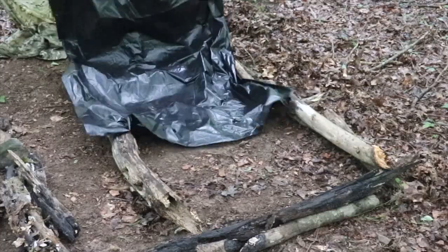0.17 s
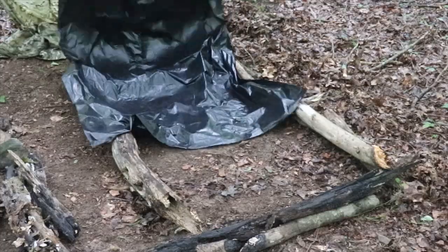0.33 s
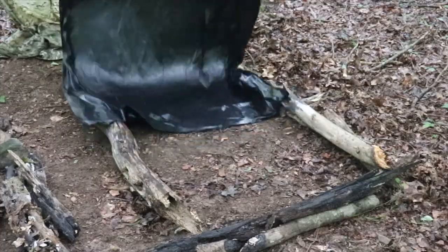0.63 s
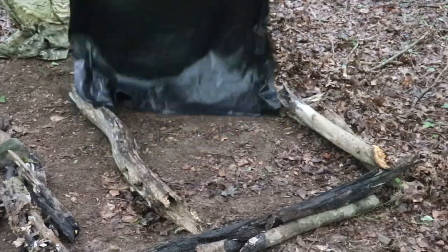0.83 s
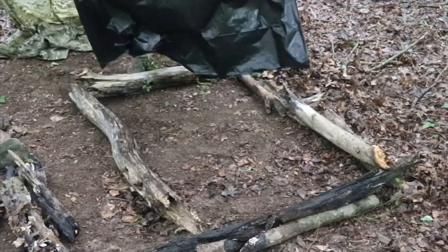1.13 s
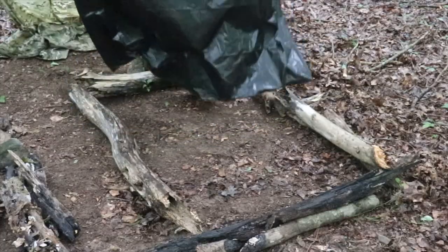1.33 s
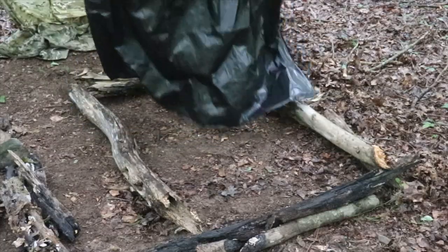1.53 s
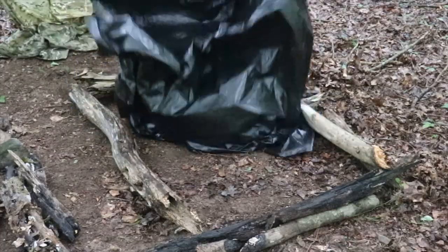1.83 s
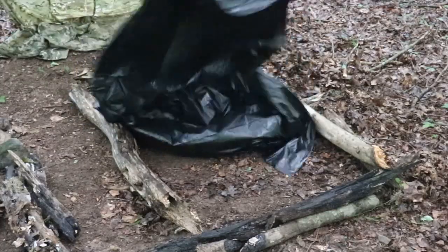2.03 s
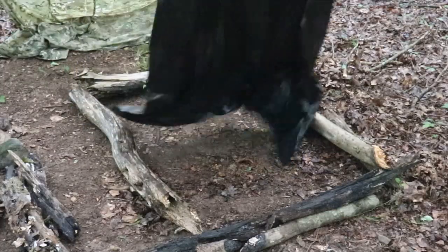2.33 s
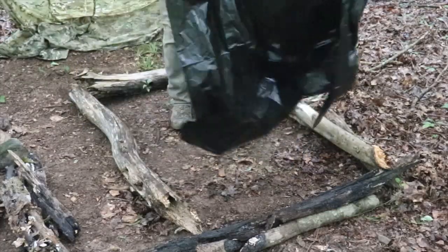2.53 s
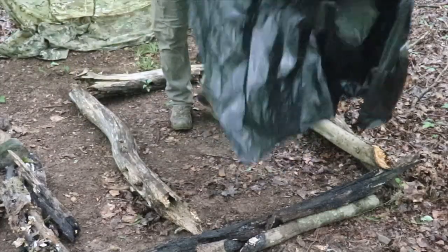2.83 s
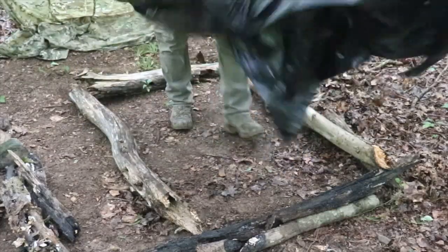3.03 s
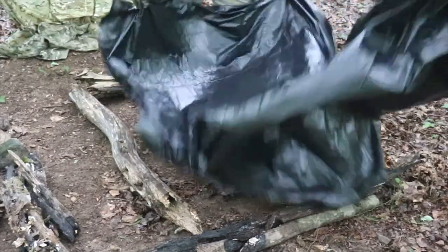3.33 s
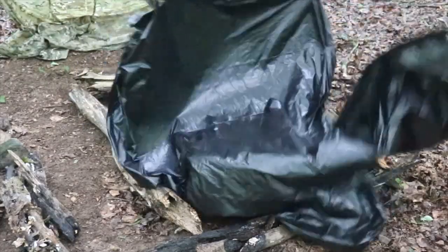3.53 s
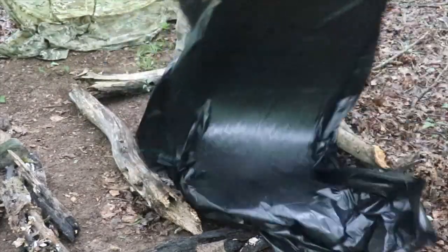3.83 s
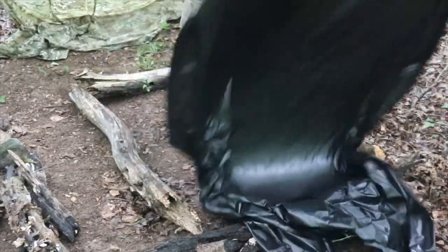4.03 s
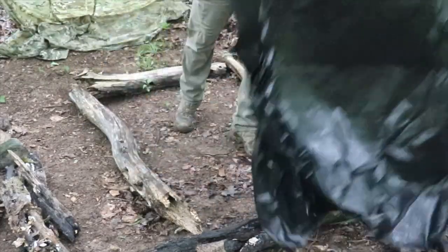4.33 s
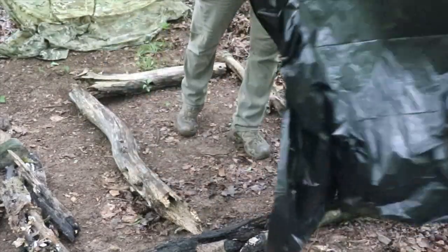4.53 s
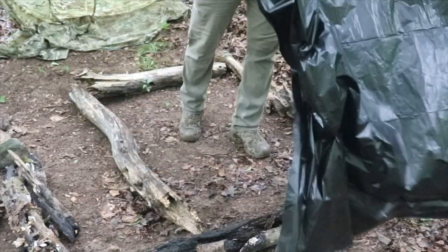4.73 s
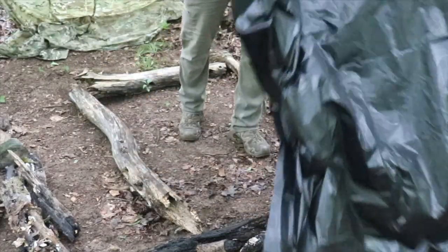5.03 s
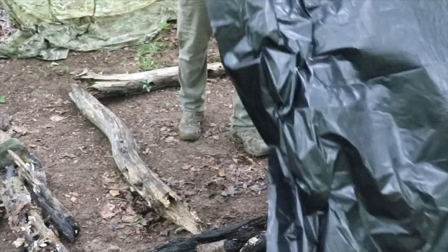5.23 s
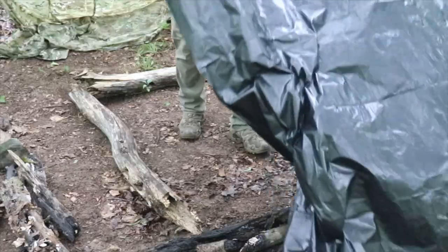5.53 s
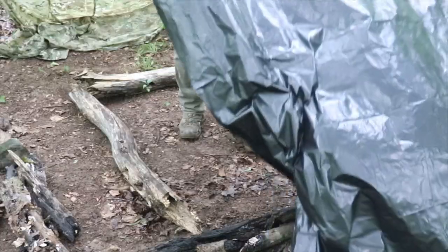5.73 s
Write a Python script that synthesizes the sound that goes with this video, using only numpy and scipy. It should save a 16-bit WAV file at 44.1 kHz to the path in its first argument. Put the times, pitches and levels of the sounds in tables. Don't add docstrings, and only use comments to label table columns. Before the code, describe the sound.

A large, thin plastic sack is shaken open by hand in quiet woodland, about two metres from a small microphone with little deep bass. Crisp, dense rustling starts at once and bursts at 0.4 s with a sharp crumple and low flap, then continues brightly until about 0.9 s. It dips around 1.0-1.2 s, duller, before swelling again at 1.3-1.5 s. The loudest crashing crackle runs from 1.9 to 2.3 s, with hard snaps and muffled thuds. After a short drop near 2.5 s, a strong snap and flap at 2.7 s leads to bright crinkling until 3.4 s. Separate shakes follow, peaking from 3.8 to 4.35 s with fizzing crackle. From 4.5 s the rustle weakens and dulls; small folds tick and crumple ever more faintly to 6 s. A faint, steady high insect hum and soft leaf hush stay underneath, with a slight diffuse tail from the trees.

```python
import sys
import numpy as np
from scipy import signal
from scipy.fft import rfft, irfft
from scipy.io import wavfile
from scipy.ndimage import uniform_filter1d

SR = 44100
rng = np.random.default_rng(int(sys.argv[2]) if len(sys.argv) > 2 else 0)


def to_linear_factor(level_db):
    exponent = np.asarray(level_db, float) / 20
    return 10 ** exponent


def put_to_file(sound):
    columns = np.atleast_2d(sound).T
    safe = np.clip(columns, -1, 1)
    whole_steps = np.round(safe * 32767)
    wavfile.write(sys.argv[1], SR, whole_steps.astype(np.int16))


N = 259922
HZ = np.arange(N // 2 + 1) * SR / N + 1
BANDS_HZ = 35 * 2 ** np.arange(0, 9.1, .5)


def level(x, db):
    return x * to_linear_factor(db) / np.sqrt(np.mean(x ** 2))


def colour(table, hz):
    table_hz, table_db = np.array(table)[:, 0], np.array(table)[:, 1]
    return np.interp(np.log(hz), np.log(table_hz), table_db)


def coloured_noise(table, db):
    return level(irfft(rfft(rng.standard_normal(N)) * to_linear_factor(colour(table, HZ)), N), db)


def band(x, hz):
    off = np.clip(2 * np.log2(HZ / hz), -1, 1)
    return irfft(rfft(x) * np.cos(np.pi * off / 2) ** 2, N)


def resonance(x, hz, width):
    b, a = signal.iirpeak(hz, hz / width, fs=SR)
    return signal.lfilter(b, a, signal.lfilter(b, a, x))


def walk(rate):
    k = int(SR / rate)
    held = np.repeat(rng.standard_normal(N // k + 1), k)
    w = uniform_filter1d(uniform_filter1d(held, k), k)[:N]
    return w / w.std()


def clicks(s, size):
    return np.bincount(np.clip((s * SR).astype(int), 0, N - 1), size, N)


def wood():
    # frequency in Hz, density in dB per Hz.
    leaves = [(30, -14), (106, -5), (300, -21), (3000, -17.5), (5500, -28), (10000, -39), (15800, -41)]
    # centre in Hz, width in Hz, rms level in dB.
    insects = [
        (4740, 320, -49.5),
        (2990, 420, -56),
    ]
    hush = coloured_noise(leaves, -52.5)
    for hz, width, db in insects:
        song = resonance(rng.standard_normal(N), hz, width)
        hush = hush + level(song * to_linear_factor(walk(60)), db)
    return hush


def handling():
    # start of full strength in seconds, hold in seconds, level in dB, crispness in dB.
    pulls = [(0, .05, -35.5, 2), (.17, .12, -35, 0), (.4, .05, -22, 0.5), (.52, .35, -29, 5),
             (0.999, .15, -37, -10), (1.23, .03, -27, -8), (1.32, .08, -22, -3), (1.46, .07, -25, 1),
             (1.68, .15, -27, -2), (1.9, .03, -24, 8), (2.0, .32, -20, 1), (2.47, .12, -34, -2),
             (2.71, .08, -20, 1.5), (2.85, .07, -21, 5), (3.049, .3, -29.5, 2), (3.421, .02, -24, -5),
             (3.55, .15, -30, 1), (3.8, .05, -28, -1), (3.92, .08, -25, 4.5), (4.079, .05, -23, 9),
             (4.26, .08, -27, -2.5), (4.451, .05, -32, -4), (4.59, .05, -30, -3), (4.7, .08, -35, -9),
             (4.84, .06, -40, -10), (4.959, .06, -35, -7), (5.1, .08, -36, -9), (5.25, .27, -43, -9),
             (5.649, .15, -50, -3), (5.88, .01, -44, -1)]
    rise_db_per_s, fall_db_per_s = 120, 90
    s, hold, db, crisp_db = np.transpose(pulls)
    t = np.arange(0, N + 99, 100)[:, None] / SR
    rise_db = rise_db_per_s * np.maximum(s - t, 0)
    fall_db = fall_db_per_s * np.maximum(t - s - hold, 0)
    power = to_linear_factor(db - rise_db - fall_db) ** 2
    total = power.sum(axis=1)
    slow = 10 * np.log10(total), power @ crisp_db / total
    return [np.interp(np.arange(N) / SR, t[:, 0], c) for c in slow]


def register_levels(effort_db, crisp_db):
    # rustle, billow, crinkle, fizz in dB per dB.
    crisp_share = [0, -0.1, 0.22, 0.92]
    effort_share = [0, -0.032, 0.15, 0.068]
    db = effort_db + np.outer(effort_share, effort_db) + np.outer(crisp_share, crisp_db)
    return db - 10 * np.log10(np.mean(to_linear_factor(db) ** 2, axis=1))[:, None]


def creases(moves_db, count=50000, busier=.3, scatter_db=1.0, most_db=12, octaves=1.0,
            slide_db=-3, shiver_s=0.0036):
    # rustle, billow, crinkle, fizz in Hz.
    register_hz = [2200, 300, 7000, 12500]
    # frequency in Hz, density in dB per Hz.
    sheet = [(18, -61), (30, -24), (106, -10), (244, -3.5), (344, -3.5), (523, -2.5), (581, -2.5),
             (1660, -1), (2040, -2), (3110, 0.5), (4730, -10), (12800, -22.5), (14600, -29), (17900, -30)]
    cluster_db = 0.25 * walk(25) + 0.99 * walk(60)
    cluster_db = cluster_db - uniform_filter1d(cluster_db, SR // 7)
    density = to_linear_factor(busier * moves_db[0])
    density = density / density.mean()
    when, big, where, sign = rng.random((count, 4)).T
    s = np.interp(when, np.cumsum(density) / N, np.arange(N) / SR)
    size = to_linear_factor(np.minimum(-scatter_db * np.log(big), most_db)) * np.sign(sign - .5)
    pitch = BANDS_HZ[0] * (BANDS_HZ[-1] / BANDS_HZ[0]) ** where
    order = np.argsort(register_hz)
    log_register = np.log(np.array(register_hz)[order])
    out = 0
    for hz in BANDS_HZ:
        nearness = np.exp(-(np.log2(pitch / hz) / octaves) ** 2)
        kicks = clicks(s, size * nearness) / np.sqrt(density)
        pops = band(kicks, hz)
        shiver = signal.lfilter([1], [1, -np.exp(-1 / (shiver_s * SR))], kicks ** 2)
        slide = band(rng.standard_normal(N) * np.sqrt(0.5 + shiver / shiver.mean()), hz)
        share = [np.interp(np.log(hz), log_register, order == k) for k in range(4)]
        crisp = np.clip(1.15 + hz / 59000.0, 0, 1.5)
        slice_db = colour(sheet, hz) + 10 * np.log10(hz)
        db = slice_db + share @ moves_db + crisp * cluster_db + 0.73 * walk(20)
        mixed = level(pops, 0) + level(slide, slide_db - 2.0 * crisp)
        out = out + to_linear_factor(db) * level(mixed, 0)
    coarse = np.c_[BANDS_HZ, colour(sheet, BANDS_HZ)]
    fine_db = colour(sheet, HZ) - colour(coarse, HZ)
    return level(irfft(rfft(out) * to_linear_factor(fine_db), N), -24.5)


def snaps(effort_db, chatter_s=0.0027, chatter_db=-9, count=120):
    # start in seconds, peak in dB, mid in relative dB, top in relative dB.
    clear_folds = [(0.167, -22, -5, -25), (0.379, -14.5, 7, -19), (0.4544, -26, 1, -14),
                   (0.5434, -21, -6, -19), (0.6054, -29, -3, -11), (0.6954, -21, -4, -24),
                   (0.913, -25, 13, -11), (1.4267, -18, 2, -22), (1.496, -12, -1, -27),
                   (1.5514, -21, -4, -24), (1.6457, -19, -4, -16), (1.8114, -22, -2, -19),
                   (2.2423, -8, -2, -17), (2.5634, -29, -4, -17), (2.6816, -13, 1, -19),
                   (2.7621, -8, 7, -28), (2.8554, -19, -1, -14), (2.9344, -13, -6, -14),
                   (2.9504, -10, -7, -19), (3.0131, -15, -5, -20), (3.1703, -14.5, -10, -19),
                   (3.2251, -18, -6, -26), (3.7684, -27, 7, -6), (3.8172, -23, -2, -15),
                   (3.9014, -23, -2, -14), (4.0224, -13, 0, -17), (4.1734, -15, 3, -14),
                   (4.262, -11, 4, -15), (4.338, -15, -5, -22), (4.377, -13.5, 10, -30)]
    # start in seconds, peak in dB, mid in relative dB, top in relative dB.
    settling = [(4.4228, -26, -4, -21), (4.4574, -29, -1, -17), (4.4837, -25, -2, -26), (4.555, -27, 1, -8),
                (4.5914, -27, 0, -16), (4.6698, -15, -17, -25), (4.7137, -28, -6, -16),
                (4.7874, -36, 4, -16), (4.8074, -37, -3, -28), (4.9057, -28, -3, -26),
                (4.9472, -26, -1, -18), (4.9786, -23, -3, -16), (5.0034, -28, -1, -18),
                (5.0564, -33, 4, -9), (5.0903, -23, -7, -21), (5.1174, -29, 1, -19), (5.1354, -27, 2, -21),
                (5.1625, -21.5, 13, -33), (5.2664, -39, -2, -29), (5.3118, -25, 1, -30),
                (5.3908, -33, -4, -24), (5.457, -29, -4, -29), (5.4819, -34, -1, -25),
                (5.5131, -25, -8, -27), (5.5224, -32, -1, -25), (5.6341, -39, 5.5, -24),
                (5.6568, -37, -4, -24), (5.7104, -32, -8, -34), (5.803, -30, -5.5, -26),
                (5.8644, -39, -0.5, -21)]
    # start in seconds, peak in dB.
    prick_peaks = [(0.3581, -23), (0.605, -26), (0.7492, -26), (1.8866, -21), (1.9794, -17), (2.176, -18),
                   (2.2433, -18), (2.6803, -26), (2.8539, -23), (2.8953, -25), (2.9502, -22), (3.2745, -24),
                   (3.3792, -24), (3.4261, -21), (3.6277, -24), (3.7678, -22), (3.8182, -22), (3.9005, -22),
                   (4.0223, -28), (4.1734, -26), (4.2413, -31), (4.2622, -27), (4.3375, -35), (4.4568, -36),
                   (4.5565, -33), (4.5905, -25), (4.6698, -26), (4.7147, -32), (4.787, -40), (5.0903, -32)]
    most_db = -12
    delay_s = .0012

    pricks = [(s, db - 5.5, -6, 4.5) for s, db in prick_peaks]

    when, chance = rng.random(count), 2 * rng.random((count, 3)).T - 1
    small_db = effort_db[(when * N).astype(int)] - 2 + 8.5 * chance[0]
    small = [when * N / SR, small_db, -9 * chance[1], -19 - 9 * chance[2]]

    s, db, mid_db, top_db = np.c_[np.transpose(clear_folds + settling + pricks), small]
    db = np.minimum(db, most_db)
    lag, size = rng.random((len(s), 2, 5)).transpose(1, 0, 2)
    times = delay_s + s[:, None] + np.c_[0 * s, -chatter_s * np.log(lag)]
    sizes = np.c_[1 + 0 * s, to_linear_factor(chatter_db) * (2 * size - 1)]
    registers = [((1200, 4600), db + mid_db - 6),
                 ((4600, 8600), db),
                 ((8600, 16500), db + top_db + 7)]
    impulse = np.r_[np.zeros(99), 1, np.zeros(99)]
    out = 0
    for edges, gain_db in registers:
        sos = signal.butter(4, edges, "bandpass", fs=SR, output="sos")
        peak = np.abs(signal.hilbert(signal.sosfilt(sos, impulse))).max()
        strengths = sizes * to_linear_factor(gain_db - 1)[:, None]
        out = out + signal.sosfilt(sos, clicks(times.ravel(), strengths.ravel())) / peak
    return out


def crumples():
    # start in seconds, peak in dB, centre in Hz.
    bursts = [(0.2447, -21, 3040), (0.377, -7.5, 1950), (0.713, -12, 3240), (0.7696, -15, 3530),
              (0.9737, -21.5, 1880), (1.0625, -23, 1710), (1.1388, -20, 3510), (1.2361, -15, 3400),
              (1.29, -15, 3030), (1.496, -7.5, 1840), (1.6921, -23, 3290), (1.961, -3.5, 2160),
              (2.1066, -4, 1530), (2.228, -10, 3410), (3.0754, -17, 969), (3.224, -9.5, 3260),
              (3.422, -15, 3290), (3.5693, -13, 2540), (3.6456, -11.5, 1510), (3.7614, -17, 2980),
              (4.1697, -8, 2680), (4.2482, -16, 2930), (4.3382, -17, 2870), (4.5935, -21, 3270),
              (4.9561, -21, 2530), (5.0909, -16, 3180), (5.379, -23, 1250), (5.5568, -23, 2100),
              (5.6346, -23.5, 2800), (5.8038, -25, 3040)]
    decay_s = .0042
    out, t = np.zeros(N + SR), np.arange(SR // 20) / SR
    for s, db, hz in bursts:
        ticks = rng.standard_normal(len(t)) ** 3 * np.exp(-t / decay_s)
        ticks[int(.001 * SR)] = 1.1 * np.abs(ticks).max()
        burst = resonance(ticks, hz, 0.97 * hz)
        i = int(s * SR)
        out[i:i + len(t)] += to_linear_factor(db - 1.5) * burst / np.abs(burst).max()
    return out[:N]


def flaps():
    # start in seconds, peak in dB, pitch in Hz, length in seconds.
    thumps = [(0.425, -13.5, 201, .014), (1.242, -25, 400, .02), (1.301, -18, 450, 0.024),
              (1.889, -19.5, 497, 0.02), (1.914, -16, 450, 0.017), (2.101, -13.5, 310, 0.015),
              (2.261, -27, 300, 0.018), (2.29, -28, 352, .015), (2.713, -10.5, 302, 0.0074),
              (3.435, -24, 500, .015), (3.93, -22, 450, .012), (4.258, -22, 300, .015),
              (4.591, -41, 402, .015)]
    out, t = np.zeros(N), np.arange(SR // 8) / SR
    for s, db, hz, length in thumps:
        swell = t / .005 * np.exp(1 - t / .005)
        tail = .35 * np.exp(-t / max(length, .004))
        thud = resonance(rng.standard_normal(len(t)) * (swell + tail), hz, 1.9 * hz)
        i = int(s * SR)
        out[i:i + len(t)] += to_linear_factor(db + 2.0) * thud / np.abs(thud).max()
    return out


def trees(sack):
    t60_s, trees_db = 0.67, -19
    lag = np.arange(SR // 2) / SR
    scatter = rng.standard_normal(len(lag)) * to_linear_factor(-60 * lag / t60_s) * (lag > .004)
    scatter = signal.lfilter([1], [1, -.5], scatter)
    return signal.fftconvolve(sack, to_linear_factor(trees_db) * scatter / np.linalg.norm(scatter))[:N]


def scene():
    background = wood()
    effort_db, crisp_db = handling()
    moves_db = register_levels(effort_db, crisp_db)
    sack = creases(moves_db) + snaps(effort_db) + crumples() + flaps()
    return (sack + trees(sack) + background)[None]


def roll_off(x):
    return signal.sosfilt(signal.butter(12, 16850, fs=SR, output="sos"), x)


def record(dry):
    bass_cut_hz, top_hz = 74, 15820
    bass_cut = signal.butter(2, bass_cut_hz, "highpass", fs=SR, output="sos")
    top_cut = signal.ellip(12, .2, 75, top_hz, fs=SR, output="sos")
    mic = signal.sosfilt(top_cut, signal.sosfilt(bass_cut, dry))
    return roll_off(mic)


dry = scene()
out = record(dry)
put_to_file(out)
```